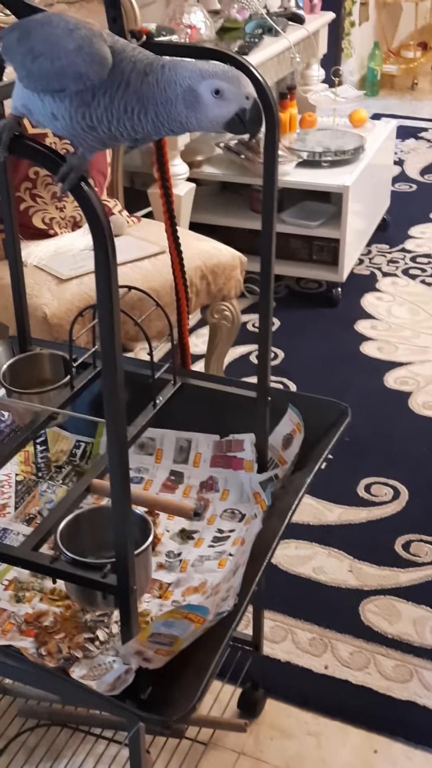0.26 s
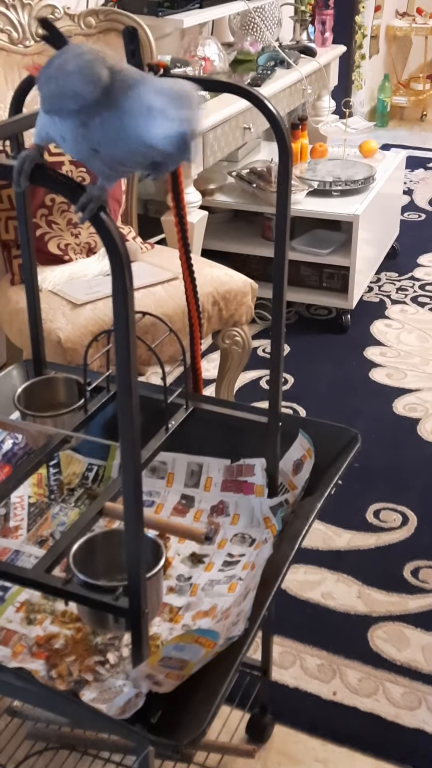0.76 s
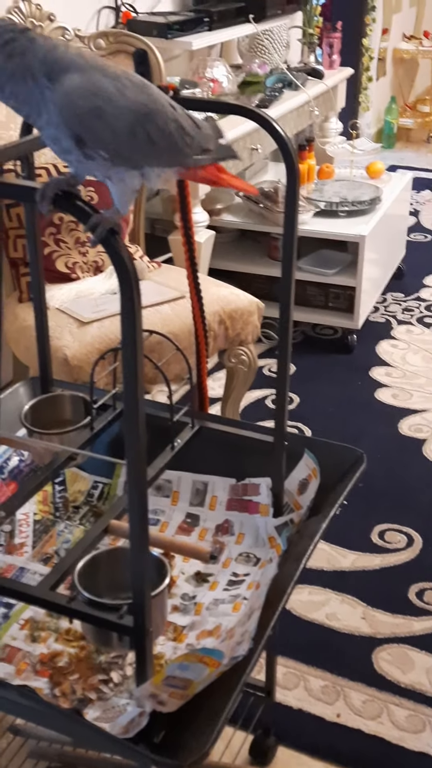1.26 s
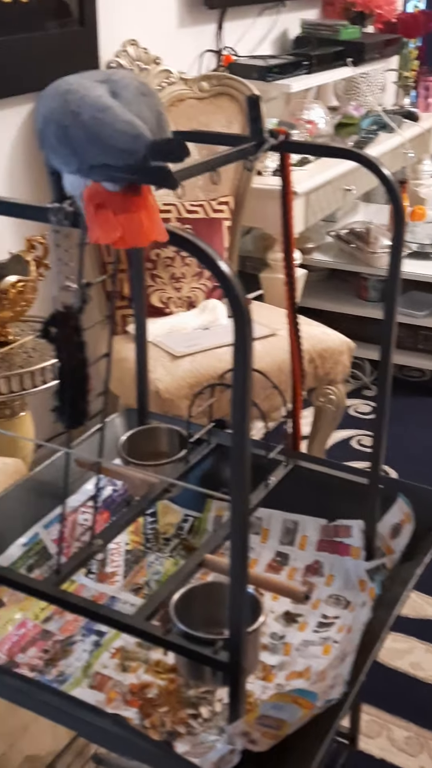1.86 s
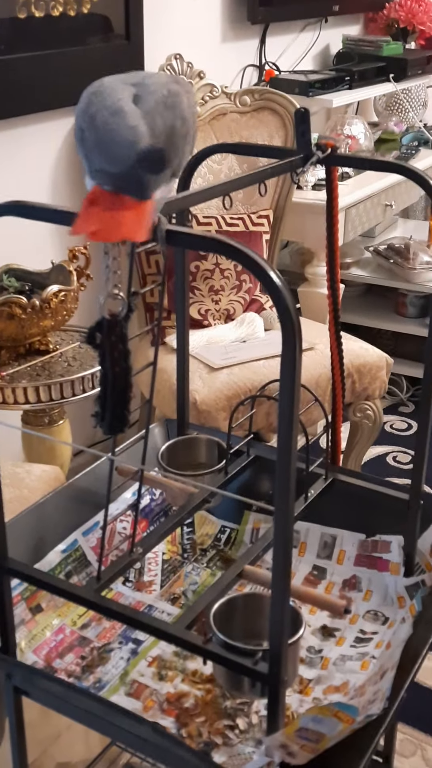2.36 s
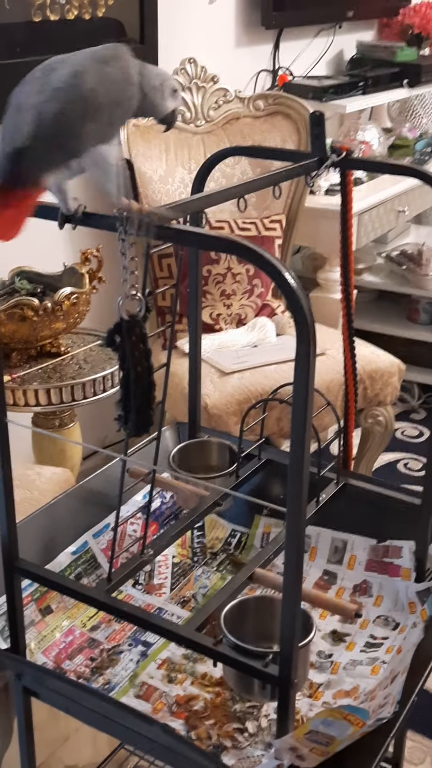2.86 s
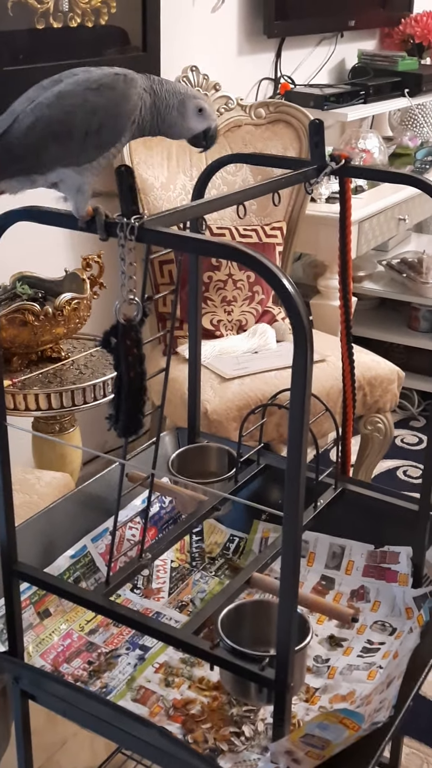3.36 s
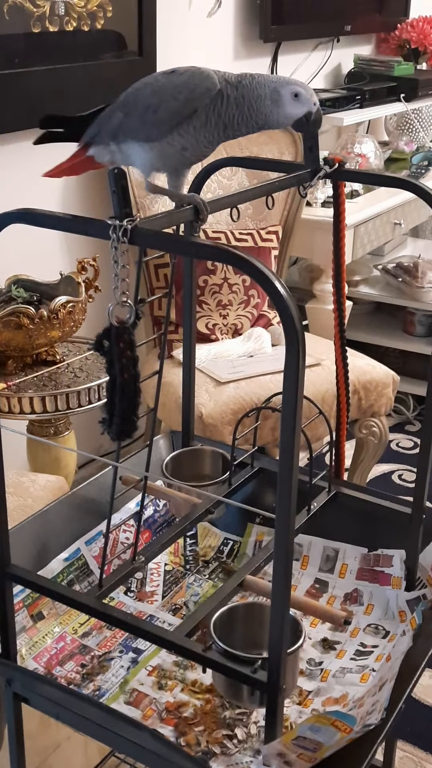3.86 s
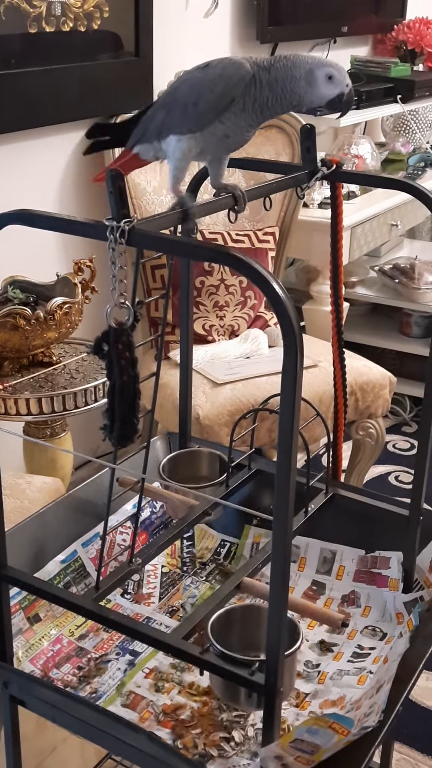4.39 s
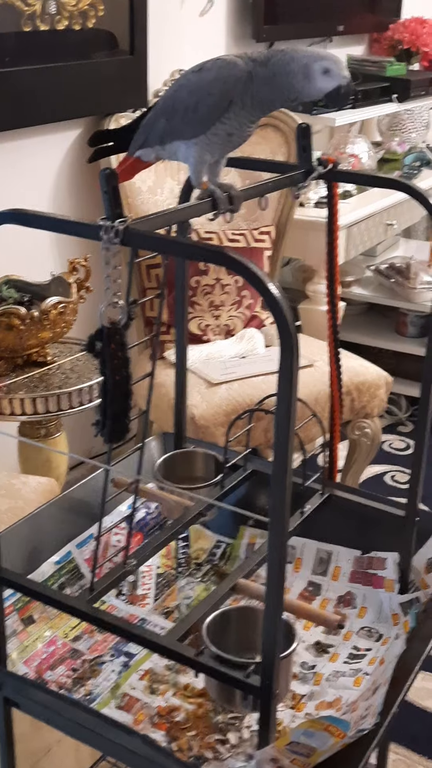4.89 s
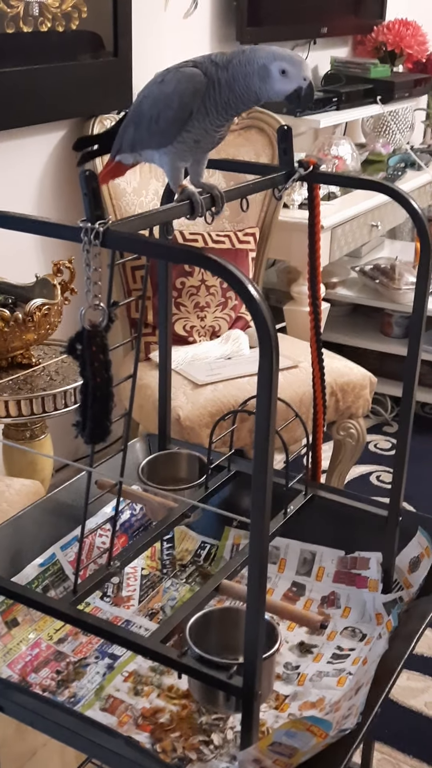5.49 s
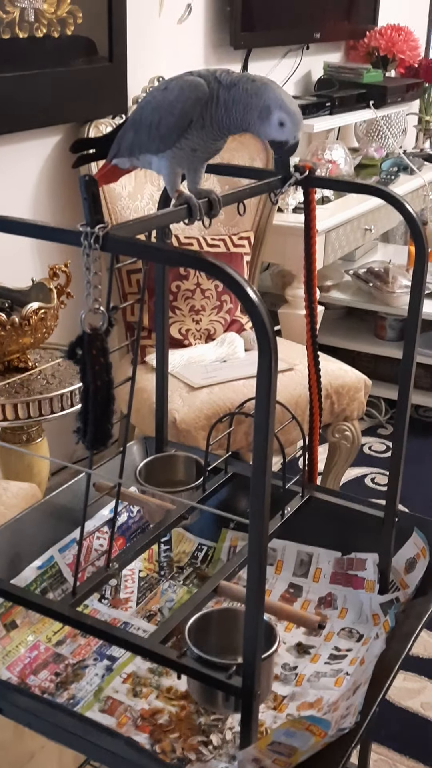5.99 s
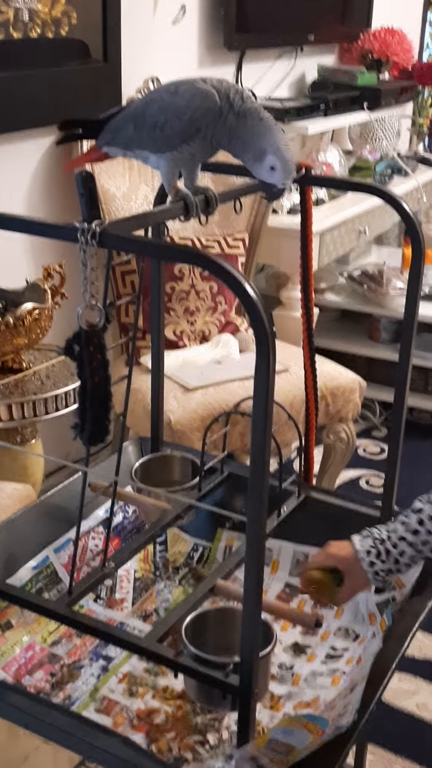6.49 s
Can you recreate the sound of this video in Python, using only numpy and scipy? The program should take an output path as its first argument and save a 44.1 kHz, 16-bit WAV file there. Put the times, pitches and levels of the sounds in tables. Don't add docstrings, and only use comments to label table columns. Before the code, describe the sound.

In a quiet, slightly echoing living room, a parrot on a metal perch makes soft tongue pops, then one sharp, quick, warbling whistle. As it turns and walks, claws tick and scrape on the ringing tubes with dull knocks. A second, much weaker chirp follows midway, then sparse pops and clicks to the end. Low hum and faint hiss lie beneath; close stereo microphone.

```python
import sys
import numpy as np
from scipy import signal
from scipy.io import wavfile
from scipy.ndimage import uniform_filter1d

SR = 44100
rng = np.random.default_rng(int(sys.argv[2]) if len(sys.argv) > 2 else 0)


def attenuation_scalar(level_db):
    decades = np.asarray(level_db, float) / 20
    return 10 ** decades


def unload_audio(sound):
    columns = np.transpose(np.atleast_2d(sound))
    steps = np.round(np.clip(columns, -1, 1) * 32767)
    wavfile.write(sys.argv[1], SR, steps.astype(np.int16))


N = 297234


def evened(x):
    return x / np.sqrt(np.mean(x ** 2) + 1e-20)


def read(points, hz):
    f, value = np.transpose(points)
    return np.interp(np.log(hz + 1), np.log(f + 1), value)


def smoothed_twice(x, size):
    return uniform_filter1d(uniform_filter1d(x, size=size, axis=-1), size=size, axis=-1)


def add(mix, s, sound, pan_db=0):
    part = mix[:, round(s * SR):][:, :len(sound)]
    part += sound[:part.shape[1]] * attenuation_scalar(np.array([[pan_db / 2], [-pan_db / 2]]))


def resonate(x, hz, width):
    turn = np.exp(2j * np.pi * hz * np.arange(x.shape[-1]) / SR)
    r = np.exp(-np.pi * width / SR)
    return 2 * (turn * signal.lfilter([1 - r], [1, -r], x / turn)).real


# (f/Hz, t60/s)
ROOM_DECAY = [(500, 0.4), (1400, 0.6), (2700, 0.43), (5400, 0.47), (8000, 0.27), (14000, 0.25)]


def room(x, wet_db, gap_s, lead, linger):
    taps = np.zeros((2, SR // 2))
    at = np.arange(0, SR // 2 - 16, 16)
    at = at + rng.integers(0, 16, (2, len(at)))
    np.put_along_axis(taps, at, rng.choice([-1., 1.], at.shape), 1)
    hz, t, z = signal.stft(taps, SR, nperseg=128)
    decay_db = -60 * t / linger / read(ROOM_DECAY, hz)[:, None]
    tail = signal.istft(z * attenuation_scalar(decay_db), SR, nperseg=128)[1]
    tail *= 1 - np.exp(-(np.arange(tail.shape[1]) / SR / gap_s) ** 2)
    tail *= attenuation_scalar(wet_db) / np.linalg.norm(tail[0])
    tail[0, 0] += 1
    tail[1, round(lead)] += 1
    return signal.oaconvolve(x, tail, axes=1)[:, :N]


# (t/s, length/s, first f/Hz, last f/Hz, level/dB)
NOTES = [(.658, .004, 4540, 5635, -48.5), (0.673, 0.0078, 1446, 1377, -28), (0.678, .013, 2300, 2986, -30),
         (0.694, .007, 3083, 2404, -27), (0.697, .012, 2290, 2130, -22), (.711, .006, 2250, 2966, -28),
         (.721, .022, 2585, 2690, -30), (.744, .019, 2690, 2662, -30), (0.758, .04, 2677, 2676, -27.5),
         (3.38, 0.0118, 1974, 2600, -43.5), (3.389, 0.013, 2602, 2128, -38.5),
         (3.404, 0.0078, 2087, 2440, -37.5), (3.412, .009, 2460, 2300, -36.5),
         (3.421, 0.01, 3215, 3000, -37), (3.434, .014, 2914, 2838, -36)]
# (multiple of the pitch, level/dB)
OVERTONES = [(2, -17.5), (3, -1), (4, -7), (5, -12.5), (6, -20)]
# (t/s, full overtone level/dB, first rasp level/dB, even overtone level/dB,
# overtone slack at the start/dB)
CALL_VOICE = [
    (.658, -51, -70, 23, 2),
    (.666, -42, -41.5, 1.5, -16),
    (3.378, -60, -75, -2, -10.5),
    (3.402, -45, -58.5, -9.5, -4),
]


def whistles():
    hz, level, over_db, rasp_db, even_db = np.zeros((5, N))
    for s, length, first_hz, last_hz, db in NOTES:
        u = np.linspace(0, 1, round(length * SR))
        start = round(s * SR)
        span = slice(start, start + len(u))
        hz[:start][level[:start] == 0] = first_hz
        hz[start:] = last_hz
        hz[span] = first_hz + (last_hz - first_hz) * (.5 - .5 * np.cos(np.pi * u))
        level[span] = attenuation_scalar(db)

    tighten_s, rasp_fade_db_per_s = .035, 109.5
    for s, full_db, first_db, pair_db, slack_db in CALL_VOICE:
        age = np.arange(N - round(s * SR)) / SR
        over_db[-len(age):] = full_db + slack_db * np.clip(1 - age / tighten_s, 0, 1)
        even_db[-len(age):] = pair_db
        rasp_db[-len(age):] = first_db - rasp_fade_db_per_s * age
    glide_loss_db_per_khz_s = 0.02
    over_db -= glide_loss_db_per_khz_s * abs(np.gradient(hz)) * SR / 1000

    sounding = level > 0
    over, rasp = attenuation_scalar(over_db) * sounding, attenuation_scalar(rasp_db) * sounding
    level, over, rasp = smoothed_twice(np.array([level, over, rasp]), 70)
    quaver = .005
    tremor = evened(smoothed_twice(rng.standard_normal(N), 120))
    turn = 2 * np.pi * np.cumsum(uniform_filter1d(hz, size=40) * (1 + quaver * tremor)) / SR

    voice = level * np.sin(turn)
    for k, db in OVERTONES:
        gain = attenuation_scalar(db + even_db * (k % 2 == 0))
        voice += over * gain * np.sin(k * turn) * (k * hz < SR / 2)
    voice += attenuation_scalar(-12.5) * level * np.sin(2 * turn) * np.clip((hz - 2800) / 200, 0, 1)
    high = signal.butter(2, 5000, "high", fs=SR)
    voice += rasp * signal.lfilter(*high, rng.standard_normal(N))

    facing = np.arange(N) < N // 3
    near = room(np.array([voice * facing] * 2), -4.5, gap_s=0.0035, lead=6.45, linger=0.87)
    return near + room(np.array([voice * ~facing] * 2), 1, gap_s=0.0022, lead=7.75, linger=0.92)


# (t/s, peak level/dB, f/Hz, cycles of ring)
POPS = [(.0912, -65.5, 2180, 3), (.1994, -59, 2070, 1.5), (.5053, -66, 1555, 5), (.53, -67, 2200, 5.3),
        (1.1394, -68, 1123, 2.1), (1.168, -68, 1720, 2.7), (1.3034, -66, 2120, 5.7),
        (1.329, -73.5, 1850, 7.1), (1.9694, -72, 2110, 5.8), (2.133, -54, 2520, 6.2),
        (2.2618, -57, 2210, 6.1), (2.551, -74, 1526, 3.7), (2.761, -67.5, 2745, 3.1),
        (3.45, -60, 1322, 1.9), (3.8437, -69.5, 1443, 4.3), (3.9814, -65, 2357, 7.5),
        (4.15, -71, 1687, 4.4), (4.2494, -77, 2715, 14), (4.4094, -74, 2080, 9.9),
        (4.5171, -58.5, 4100, 3.2), (4.5535, -56, 2120, 2.6), (4.7905, -62, 1450, 4.7),
        (4.9277, -66.5, 2840, 5.6), (5.0893, -72.5, 1660, 6.6), (5.09, -56, 4580, 2.2),
        (5.463, -65, 2579, 5.6), (5.6096, -66, 1810, 2.9), (5.73, -72, 2300, 4.1), (6.139, -75, 1100, 2.9),
        (6.1514, -64, 1750, 2.68)]
# (t/s, peak level/dB, f/Hz, second cavity level/dB)
DOUBLE_POPS = [
    (.3651, -64, 1440, -65),
    (1.4722, -69, 1570, -69),
    (5.1377, -64, 1680, -62),
    (5.677, -78.5, 1414, -69.5),
    (5.9873, -78.5, 1567, -73),
]
# (t/s, peak level/dB, f/Hz)
CLICKS = [(.101, -71.5, 4700), (.409, -72, 2850), (0.53, -71.5, 4440), (0.6688, -47.5, 4260),
          (.679, -39.5, 3520), (.688, -37, 3650), (.869, -59, 4350), (1.1093, -71, 4260),
          (1.6507, -55.5, 3470), (1.7497, -60, 3590), (1.9245, -60, 3500), (2.5314, -64, 3470),
          (2.6197, -61, 3420), (2.6504, -67, 3500), (2.706, -70, 2970), (2.8712, -60.5, 3345),
          (3.04, -66, 3446), (3.19, -74, 2950), (3.571, -60.5, 3616), (4.3267, -63, 4030),
          (4.4475, -70, 3930), (5.0, -73.5, 3510), (5.22, -72.5, 4300), (6.14, -75, 3890)]
# (t/s, peak level/dB, f/Hz)
RINGS = [
    (1.999, -73.5, 8230),
    (3.672, -63, 8300),
]
# (t/s, left-right level/dB)
HEAD = [
    (0, 0),
    (1.5, 0.5),
    (2.2, -4),
    (3.9, -0.5),
    (4.3, -2),
    (5.5, 0.6),
    (6.2, -5),
]


def pops():
    out = np.zeros((2, 2, N))
    t = np.arange(0, .03, 1 / SR)
    rows = list(POPS)
    rows += [(*row, 5.3) for row in CLICKS]
    rows += [(*row, 38) for row in RINGS]
    for s, db, hz, second_db in DOUBLE_POPS:
        rows += [(s, db, hz, 6.6), (s + .002, second_db, 2300, 4.1)]
    for k, (s, db, hz, cycles) in enumerate(rows):
        rising = np.sin(2 * np.pi * hz * t * (1 + 1.9 * t))
        ring = rising * np.exp(-t * hz / cycles) * (1 - np.exp(-t / 0.00048))
        add(out[k % 2], s, attenuation_scalar(db + 8.5) * ring, np.interp(s, *np.transpose(HEAD)))
    return sum(room(part, 3, gap_s=.003, lead=1, linger=.65) for part in out)


# (t/s, peak level/dB, loudest f/Hz, low part level/dB)
STEPS = [(0.067, -74, 8210, 2), (0.132, -66, 7810, 6.5), (.362, -79.5, 7630, 10), (0.432, -72, 10000, -9),
         (1.164, -67.5, 10500, -1.5), (1.3044, -64, 7800, -1.5), (1.459, -68, 7700, -1),
         (2.1222, -35, 8850, -19), (2.1375, -35.5, 8200, -7.5), (2.5284, -50.5, 7460, -6.5),
         (2.6194, -61.5, 7670, -15), (2.6518, -51.5, 14300, -15.5), (2.7646, -53.5, 8700, -15),
         (2.841, -63, 7300, -9), (2.8888, -58.5, 13300, -7), (2.9194, -47.5, 8450, -1),
         (2.9527, -51, 8700, 1.5), (3.1767, -64, 8920, -8.5), (3.6686, -57.5, 9450, -13),
         (4.0713, -71, 7420, -12), (4.1218, -66, 7070, -4.5), (4.312, -64.5, 9830, -14.5),
         (4.512, -58, 11200, -15.5), (4.5976, -64.5, 7850, -1.5), (4.7491, -63, 8390, -7.5),
         (4.9917, -57.5, 13960, -16), (5.4605, -63, 7570, -6.5), (5.6157, -63.5, 8400, -9.5),
         (5.9141, -70.5, 8040, -1)]
# (t/s, peak level/dB, loudest f/Hz, breadth as a share of the pitch)
TICKS = [(.2892, -83, 14400, 0.63), (1.0204, -78, 12370, .52), (1.3865, -64, 7790, .81),
         (1.5815, -67.5, 7800, 0.57), (1.6475, -61, 7250, .93), (1.684, -49.5, 9090, .99),
         (1.789, -51.5, 6040, 0.96), (1.943, -62, 13100, .75), (1.9993, -53, 11800, 0.54),
         (2.379, -53.5, 13170, 0.53), (2.456, -53.5, 8400, 0.93), (3.7727, -48, 8080, 1),
         (3.7923, -40.5, 11160, 1), (3.8774, -60.5, 8800, .42), (4.3724, -62, 7500, 0.51),
         (4.4583, -54.5, 13000, 0.24), (5.4195, -60, 6750, 0.56), (5.522, -70, 8210, .7),
         (5.6476, -65.5, 7980, 0.32), (6.576, -65, 7160, 0.31), (6.6179, -63.5, 10800, 0.31),
         (6.6473, -58, 10560, 0.37), (6.7161, -65, 5500, 0.64)]
# (f/Hz, width/Hz, level/dB)
TUBES = [(6230, 330, -46), (8300, 870, 12), (10500, 440, 6), (12200, 4600, -1.5)]


def claws():
    out = np.zeros((2, 2, N))
    t = np.arange(0, .04, 1 / SR)
    stroke = 0.82 * np.exp(-t / 0.0035) * (1 - np.exp(-t / 0.0023))
    low = signal.butter(1, [1600, 4600], "band", fs=SR)
    rows = [(s, db, hz, low_db, 0.55 + .012 * (db + 59)) for s, db, hz, low_db in STEPS]
    rows += [(s, db, hz, -26, breadth) for s, db, hz, breadth in TICKS]
    for k, (s, db, hz, low_db, breadth) in enumerate(rows):
        grit = rng.standard_normal((2, len(t))) * stroke
        edges_hz = hz / (1 + breadth / 2), min(hz * (1 + breadth), .45 * SR)
        band = signal.butter(2, edges_hz, "band", fs=SR)
        burst = signal.lfilter(*band, grit[0]) / np.sqrt(breadth)
        ring = sum(attenuation_scalar(d) * resonate(grit[0], f, w) for f, w, d in TUBES)
        thud = signal.lfilter(*low, grit[1])
        sound = burst + attenuation_scalar(-17.5) * ring + attenuation_scalar(low_db + 4) * thud
        pan_db = 0.7 + 4.5 * np.log2(hz / 8000)
        add(out[k % 2], s, attenuation_scalar(db + 3.5) * sound, pan_db)
    return sum(room(part, 7.15, gap_s=0.0025, lead=1, linger=0.92) for part in out)


# (t/s, level/dB, f/Hz, length/s)
JERKS = [
    (.71, -62.5, 460, .045),
    (3.44, -66, 575, 0.04),
    (2.14, -61, 480, 0.016),
    (5.17, -75, 800, 0.028),
    (1.1, -63, 273, 0.014),
]


def jerks():
    out = np.zeros((2, N))
    t = np.arange(0, .25, 1 / SR)
    for s, db, hz, length in JERKS:
        puff = rng.standard_normal(len(t))
        for _ in range(2):
            puff = resonate(puff, hz, 0.6 * hz)
        swell = t / length * np.exp(1 - t / length)
        add(out, s, attenuation_scalar(db) * evened(puff) * swell, -3)
    return out


# (f/Hz, level/dB per Hz)
HUM = [(24, -29), (40, 1.5), (76, -2), (123, -10), (317, -21), (377, -25.5), (438, -19.5), (472, -30),
       (577, -27.5), (973, -36.5), (1640, -38), (2920, -43.5), (3840, -45.5), (9890, -47.5), (15500, -43.5)]
# (t/s, level/dB)
SWELL = [(0.0, -54.5), (0.3, -64.5), (0.84, -56.5), (1.05, -68), (1.22, -55), (1.93, -65.5), (2.12, -51),
         (2.53, -63), (2.91, -56.5), (3.36, -61), (3.47, -51), (3.58, -58.5), (4.77, -63), (4.86, -53),
         (4.97, -70.5), (5.44, -53.5), (6.03, -57.5), (6.45, -68)]
# (f/Hz, width/Hz, level/dB)
DRONES = [(59.06, 27, -71.5), (104.2, 12, -70), (307.5, 69, -70.5), (442, 7.5, -80.5), (499, 18, -83),
          (570.5, 17, -82.5)]
# (f/Hz, correlation)
SAME = [(60, 0.86), (180, 1), (550, -0.013), (1650, -0.046), (4970, 0.0097), (15000, -0.11)]
# (f/Hz, left-right level/dB)
TILT = [(60, -3.5), (180, -7), (550, -4.5), (1650, 1), (4970, -1), (15000, 4.5)]


def hum():
    frames, hz = N // 512 + 5, np.fft.rfftfreq(2048, 1 / SR)
    a, b, c, d, patches = rng.standard_normal((frames, 1025, 5)).T
    patches = evened(uniform_filter1d(uniform_filter1d(patches, 20, 0), 8, 1))
    s, swell_db = np.transpose(SWELL)
    swell_db = np.interp(np.arange(frames) * 512 / SR, s, swell_db - swell_db.mean())
    bass_swell_db = swell_db / (1 + (hz[:, None] / 150) ** 2)

    same = np.clip(read(SAME, hz), -1, 1)[:, None]
    left = a + 1j * b
    right = same * left + np.sqrt(1 - same ** 2) * (c + 1j * d)
    tilt_db = read(TILT, hz)[:, None] / 2
    z = np.array([left, right]) * attenuation_scalar(read(HUM, hz)[:, None] + 1.2 * patches + bass_swell_db)
    z *= attenuation_scalar(np.array([tilt_db, -tilt_db]))
    air = signal.istft(z, nperseg=2048, noverlap=1536)[1][:, :N]

    noise = rng.standard_normal(N)
    drones = sum(attenuation_scalar(db) * evened(resonate(resonate(noise, f, w), f, w)) for f, w, db in DRONES)
    both = attenuation_scalar(-58.5) * evened(air) + drones * attenuation_scalar(np.array([[-2.5], [2.5]]))
    return np.array([np.roll(both[0], 10), both[1]])


def scene():
    return whistles() + pops() + claws() + jerks() + hum()


def low_pass(x):
    return signal.sosfilt(signal.butter(12, 16480, fs=SR, output="sos"), x)


# (f/Hz, width/Hz, level/dB)
PORT = (8040, 745, -2.3)


def record(dry):
    bass_cut = signal.sosfilt(signal.butter(14, 38, "high", fs=SR, output="sos"), dry)
    port_hz, port_width, port_db = PORT
    heard = bass_cut + attenuation_scalar(port_db) * resonate(bass_cut, port_hz, port_width)
    edge = signal.firwin(401, 15900, window=("kaiser", 9), fs=SR)
    mix = signal.oaconvolve(heard, edge[None], "same")
    return low_pass(mix)


dry = scene()
out = record(dry)
unload_audio(out)
```